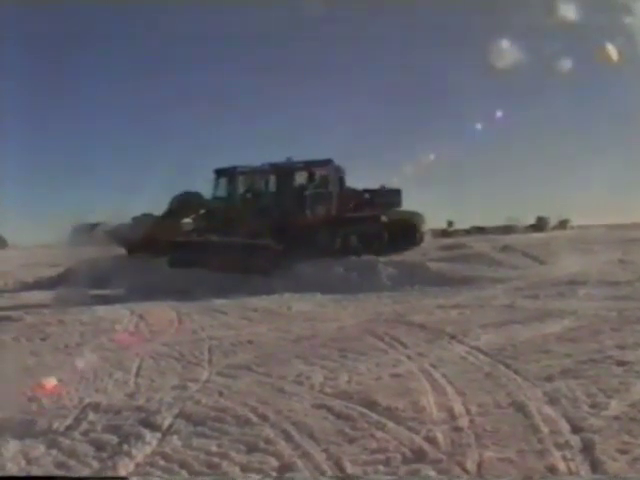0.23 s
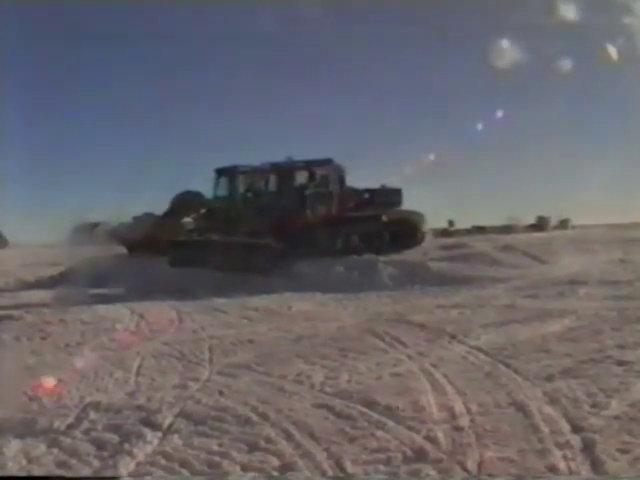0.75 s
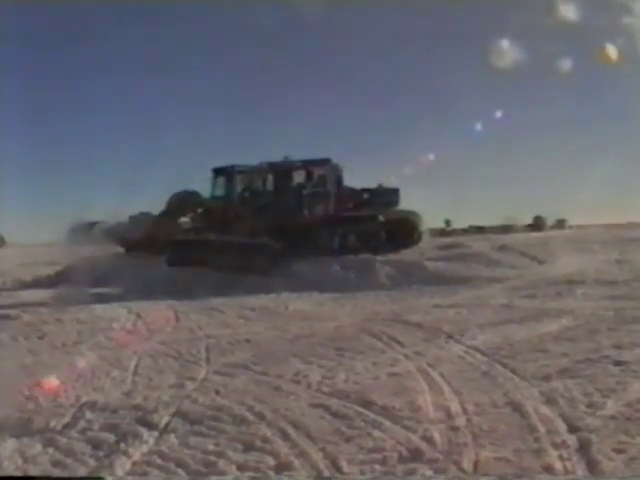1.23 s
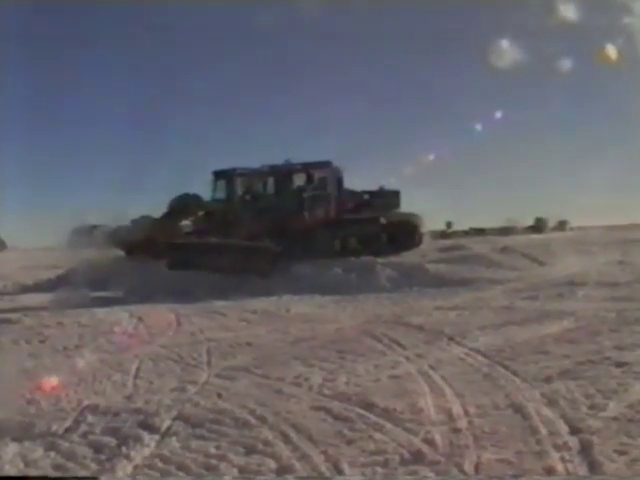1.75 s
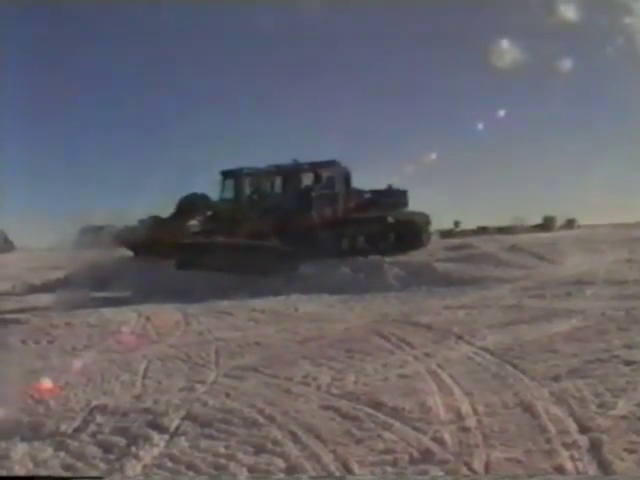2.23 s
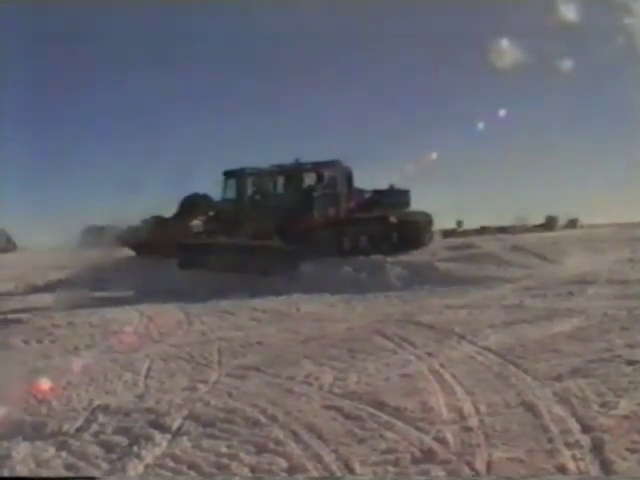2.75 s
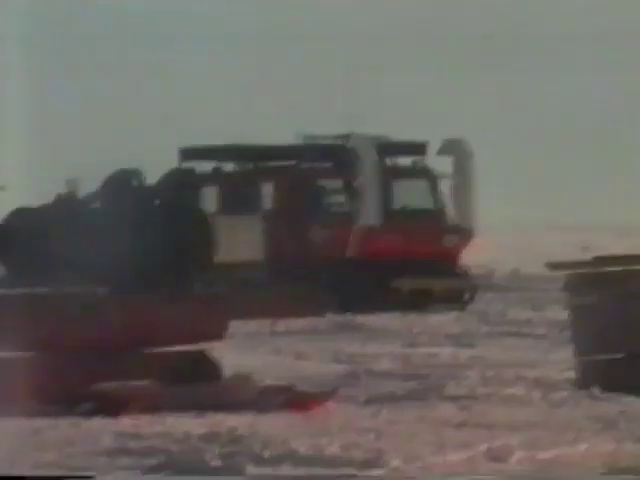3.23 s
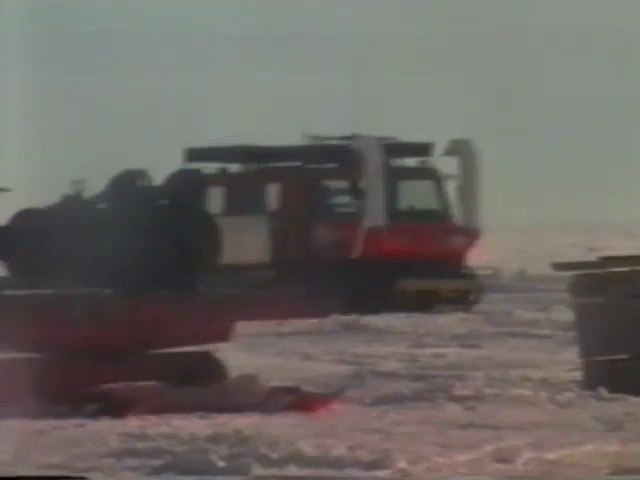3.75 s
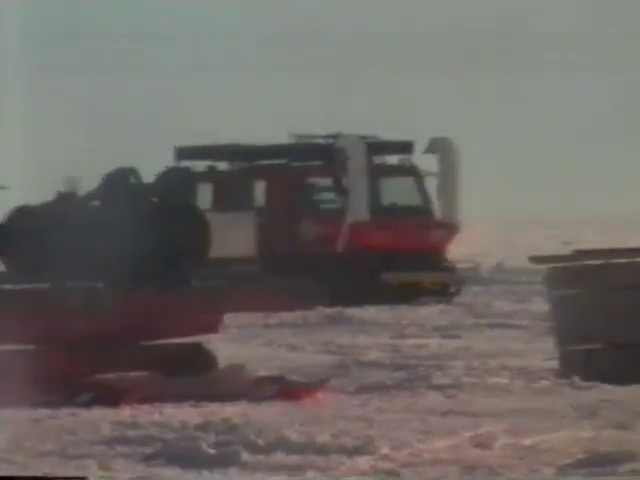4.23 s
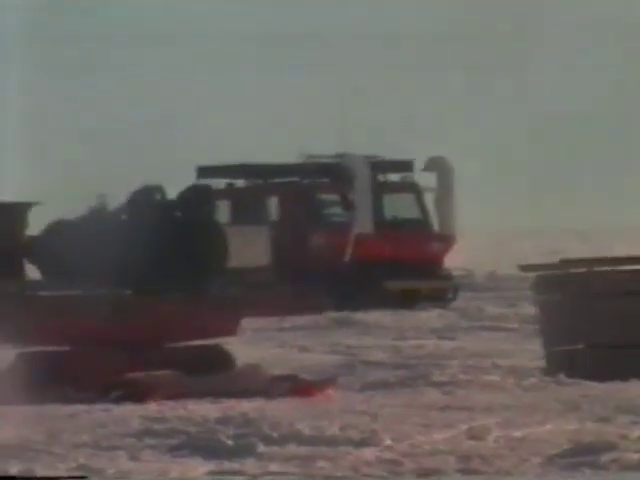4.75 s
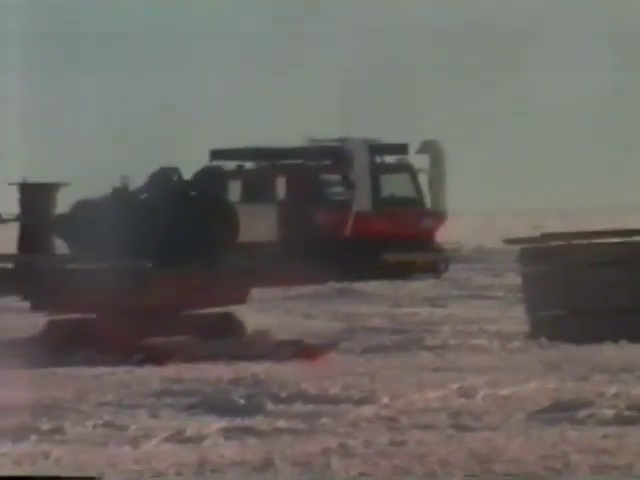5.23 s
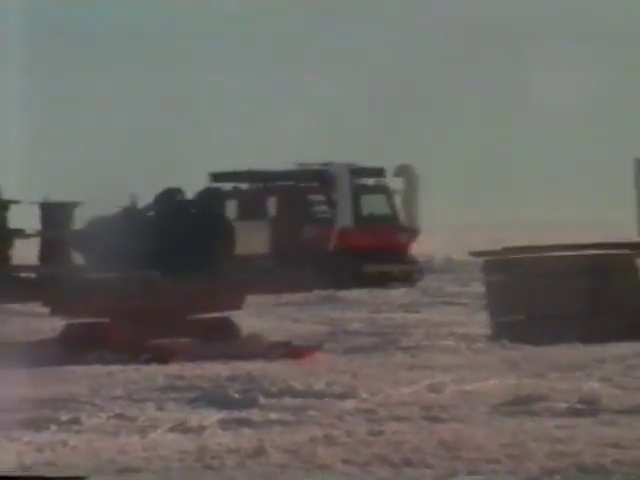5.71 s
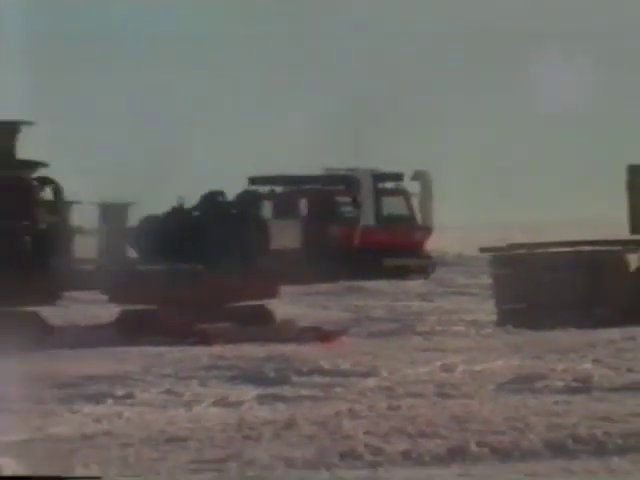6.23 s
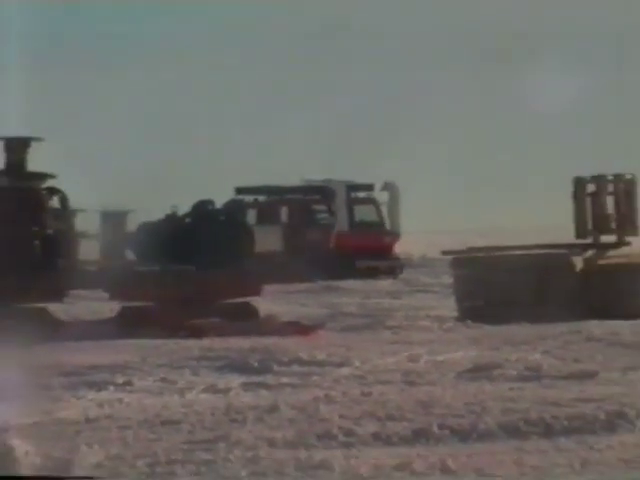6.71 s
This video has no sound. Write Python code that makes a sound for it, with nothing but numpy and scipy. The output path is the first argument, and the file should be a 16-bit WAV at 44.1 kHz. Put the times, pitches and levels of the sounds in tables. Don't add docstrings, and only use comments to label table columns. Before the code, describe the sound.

A tracked snow vehicle's rough diesel idle knocks unevenly under steady high hiss, switches abruptly to a second engine, and ends with a loose-part rattle.

```python
import sys
import numpy as np
from scipy import signal
from scipy.fft import rfft, irfft, next_fast_len
from scipy.io import wavfile
from scipy.ndimage import map_coordinates

SR = 44100
rng = np.random.default_rng(int(sys.argv[2]) if len(sys.argv) > 2 else 0)


def volts(x):
    e = np.asarray(x, float) / 20
    return 10 ** e


def unload_wav(signal):
    wavfile.write(
        sys.argv[1],
        SR,
        np.round(np.clip(np.atleast_2d(signal).T, -1, 1) * 32767).astype(np.int16),
    )


N = 307818

CUT_S = 3.335
FRAME_HZ, LINE_HZ = 25, 15625

# rate in Hz, first cycle in seconds, share of noise that repeats (0-1).
CYCLE_NEAR = (12.424, 0, .45)
CYCLE_FAR = (12.404, 0, .4)
# place in the cycle (0-1), strength in dB, sharpness in dB.
BLOWS_NEAR = [
    (.012, -2, 4),
    (.062, -.5, 1.5),
    (.115, -1.5, 1),
    (.188, -1.5, -1.5),
    (.262, 4, -.5),
    (.34, -3.5, 3.5),
    (.41, -3.5, -4),
    (.73, -7, -5),
    (.83, -5.5, 3.5),
    (.94, -6.5, -5),
]
BLOWS_FAR = [
    (.05, -8, 1),
    (.22, -1.5, 3),
    (.275, -.5, 1.5),
    (.335, -3, 0),
    (.39, -.5, 2),
    (.45, -2, 2),
    (.505, 3.5, -1),
    (.56, -2.5, -1.5),
    (.635, -2, -1),
    (.73, -5, 1),
]
# low edge in Hz, high edge in Hz, decay in seconds, dB gained per dB of sharpness,
# steady level in dB for the near view, then for the far view.
PARTS = [
    (193, 740, 0.0026, -0.37, -7, -6),
    (901, 1603, 0.0017, 0.1, -1.2, 1),
    (1853, 2350, 0.0056, 1.4, 10, 0),
    (2245, 3184, 0.0055, 1.1, -5, -4),
    (3700, 10000, 0.002, 0.44, -2.5, -3.5),
]
# frequency in Hz, level in dB per Hz.
COLOUR_NEAR = [(250, -39), (420, -31), (530, -12.5), (728, -6), (976, -11.5), (1060, -2), (1220, -1.5),
               (1550, -8.5), (2130, -7.5), (2350, -9.5), (2660, -15), (3400, -21), (5410, -24.5),
               (6820, -28), (7800, -33), (10100, -64), (17200, -120)]
COLOUR_FAR = [(250, -38), (420, -13.5), (489, -16), (576, -3), (629, -8), (687, -3.5), (1290, -1),
              (1600, -0.5), (1750, -2.5), (2280, 2.5), (3690, -14), (4460, -12.5), (5530, -17.5),
              (6680, -16.5), (8600, -25), (11200, -40), (18900, -120)]
# frequency in Hz, width in Hz, boost in dB.
PANELS_NEAR = [(1184, 24, 3.5), (1266, 78, 3), (1445, 27, 5), (2130, 60, 2.5), (2625, 236, 8),
               (3950, 300, -3.5), (4310, 150, 3.5), (4580, 140, 3.5), (5120, 70, 3.5), (6850, 200, 2.5)]
PANELS_FAR = [(742, 84, 4.5), (1613, 43, 4), (1727, 18, 5.5), (1917, 28, 7), (1967, 17, 6), (2064, 34, 3.5),
              (2280, 31, 5.5), (3750, 350, -1.5), (4296, 90, 5.5), (4740, 250, 1.5)]
# time in seconds, load in dB.
LOAD_NEAR = [
    (0, 2.5),
    (.45, 1.5),
    (1.4, -0.2),
    (1.7, 0.1),
    (2.52, 0.9),
    (2.66, 1.9),
    (3.35, 3.2),
]
LOAD_FAR = [
    (3.33, .9),
    (4.3, -1.1),
    (4.7, .9),
    (5.15, 0.83),
    (5.3, -.9),
    (5.7, -0.32),
    (6.1, 1.4),
    (6.98, -0.39),
]
# engine level in dB, fan level in dB, dB per dB of load for each part, the same for the fan.
DRIVE_NEAR = (-39, -59.5, [.2, 0.19, 0.2, 1.14, 0.99], 0.74)
DRIVE_FAR = (-43, -56, [0.21, -0.18, -0.089, 0.0024, 0.93], 1)
# time in seconds, strength in dB, sharpness in dB (raises the high knock, lowers the low).
RATTLE = [(6.724, -44, -2), (6.739, -40, 4), (6.756, -36, 6), (6.762, -40, 0.5), (6.776, -33.5, 2.5),
          (6.798, -37.5, 1), (6.816, -41.5, 8), (6.83, -41, 6), (6.845, -41, 1), (6.866, -46, 7),
          (6.894, -45.5, -3)]
# time in seconds, level in dB.
CRACKS = [
    (6.739, -46),
    (6.758, -44.5),
    (6.764, -44),
    (6.8, -55),
]
# frequency in Hz, level in dB per Hz.
LOOSE_PART = [
    [(100, -80), (200, -40), (330, -14), (500, -5), (700, 0), (900, -5), (1300, -26), (3000, -90)],
    [(200, -80), (500, -30), (900, -3), (1200, 0), (1600, -8), (2100, -7), (2800, -15), (4000, -32),
     (9000, -90)],
    [(800, -80), (2000, -30), (4000, -3), (7500, 0), (12500, 0), (15500, -6)],
]
# frequency in Hz, level in dB per Hz.
FAN_NEAR = [(5000, -90), (7000, -30), (8400, -8), (9000, -4), (10200, 0), (11000, -2.5), (12000, -8.5),
            (13500, -9.5), (14500, -15), (15000, -18), (15500, -13)]
FAN_FAR = [(5000, -90), (7000, -30), (8500, -8), (9500, -4.5), (10500, -1), (11200, 0), (12000, -3),
           (13000, -6), (14000, -9), (15000, -12), (15500, -11)]
# frequency in Hz, level in dB per Hz.
RUMBLE = [(20, -10), (100, -8), (250, -2), (450, 0), (700, -20), (1500, -90)]
# frequency in Hz, level in dB.
BUZZ = [(20, 1), (40, 3.5), (130, 2), (230, -6), (400, -18.5), (800, -10), (3000, -38), (15000, -37)]
# time in seconds, peak in dB.
TICKS = [(0.738, -44), (.978, -47), (2.578, -44), (3.658, -42), (4.018, -37), (4.578, -44), (4.699, -43),
         (6.378, -43)]
# frequency in Hz, level in dB.
CROSSTALK = [(250, -42), (345, -30), (520, -19.5), (1400, -19.5), (2800, -23.5), (5500, -24.5), (7300, -26),
             (11000, -28), (13000, -34), (15000, -36)]
# frequency in Hz, level in dB per Hz.
TAPE_HISS = [(20, -1), (100, -3), (350, .1), (700, 0.5), (2000, 0), (2800, -4.5), (4100, -15), (7300, -25),
             (11000, -25), (13000, -33), (15500, -30)]
# frequency in Hz, level in dB per Hz.
TAPE_FLUTTER = [(15, -10), (35, -8), (90, -5), (250, -12), (600, -79)]


def unit(x):
    return x / np.sqrt(np.mean(x ** 2) + 1e-20)


def along(points, hz):
    f, v = np.transpose(points)
    return np.interp(np.log(hz + 1), np.log(f + 1), v)


def load_curve(rows):
    s, load_db = np.transpose(rows)
    return np.interp(np.arange(N) / SR, s, load_db)


def wobble(rate):
    knots = rng.standard_normal(int(N * rate / SR) + 4)
    return map_coordinates(knots, [np.arange(N) * rate / SR])


def filtered(x, gain):
    m = 2 * next_fast_len(N // 2 + 8192)
    cepstrum = irfft(np.log(gain(np.fft.rfftfreq(m, 1 / SR)) + 1e-6), m)
    cepstrum[1:m // 2] *= 2
    cepstrum[m // 2 + 1:] = 0
    return irfft(rfft(x, m) * np.exp(rfft(cepstrum)), m)[..., :N]


def coloured_noise(colour):
    return unit(filtered(rng.standard_normal(N), lambda hz: volts(along(colour, hz))))


def band(hz, low_hz, high_hz):
    return ((1 + (low_hz / (hz + 1)) ** 12) * (1 + (hz / high_hz) ** 12)) ** -.5


def repeating(starts, share, drift):
    size = int(np.max(np.diff(starts))) + 1
    fresh = rng.standard_normal((len(starts) + 20, size))
    slow = signal.lfilter([np.sqrt(1 - drift ** 2)], [1, -drift], fresh, axis=0)[20:]
    turn = np.clip(np.searchsorted(starts, np.arange(N), "right") - 1, 0, None)
    again = slow[turn, np.clip(np.arange(N) - starts[turn], 0, size - 1)]
    return np.sqrt(share) * again + np.sqrt(1 - share) * rng.standard_normal(N)


def engine(cycle, blows, colour, panels, load, drive, which):
    rate, first, share = cycle
    place, strength_db, sharp_db = np.transpose(blows)
    level_db, _, per_part, _ = drive
    load_db = load_curve(load)
    turns = np.arange(int(N / SR * rate) + 2)
    starts = np.round((first + turns / rate) * SR).astype(int)
    when = (starts[:, None] + place % 1 * SR / rate).astype(int).ravel()
    shared_scatter = rng.standard_normal((len(turns), len(place)))
    noise = repeating(starts, share, .85)
    t = np.arange(SR // 40) / SR

    def ring(hz):
        panel_db = sum(db / (1 + (2 * (hz - c) / w) ** 2) for c, w, db in panels)
        return volts(along(colour, hz) + panel_db)

    total = 0
    for (low_hz, high_hz, decay, feels, *steady_db), grow in zip(PARTS, per_part):
        own_scatter = rng.standard_normal(shared_scatter.shape)
        blow_db = strength_db + feels * sharp_db + .8 * shared_scatter + 1.4 * own_scatter
        power = volts(2 * blow_db).ravel()
        fade = np.exp(-t / decay) * (1 - np.exp(-t / .0015))
        swell = signal.fftconvolve(np.bincount(when, power, N + SR), fade / fade.max())[:N]
        shake = unit(noise * np.sqrt(np.abs(swell) + volts(2 * steady_db[which])))
        part = filtered(shake, lambda hz: ring(hz) * band(hz, low_hz, high_hz))
        total = total + part * volts(grow * load_db)
    hz = np.fft.rfftfreq(4096, 1 / SR)
    middle = np.sqrt(np.mean(ring(hz) ** 2 * (hz > 500) * (hz < 1700)))
    return volts(level_db) * total / middle


def pump():
    t = np.arange(N) / SR
    tone = filtered(rng.standard_normal(N), lambda hz: 1 / (1 + ((hz - 1613) / 18) ** 2))
    swell_db = 3 * np.cos(2 * np.pi * (CYCLE_FAR[0] * t - .45))
    eased = (1 + np.tanh((t - 4.4) / 0.11)) / 2
    return volts(-51.5 - 7.5 * eased + swell_db) * unit(tone)


def rattle():
    levels, t = np.zeros((3, N + SR)), np.arange(SR // 8) / SR
    knock_t60 = np.array([[0.096], [0.058]])
    for s, db, sharp_db in RATTLE:
        both_db = np.array([[db - sharp_db], [db + sharp_db]]) - 60 * t / knock_t60
        start = round(s * SR)
        levels[:2, start:start + len(t)] += volts(both_db) * np.minimum(t / 0.00099, 1)
    for s, db in CRACKS:
        start = round(s * SR)
        levels[2, start:start + len(t)] += volts(db - 60 * t / 0.06) * np.minimum(t / .0012, 1)
    bursts = levels[:, :N] * rng.standard_normal((3, N))
    hz, total = np.fft.rfftfreq(4096, 1 / SR), 0
    for burst, colour in zip(bursts, LOOSE_PART):
        even = 1 / np.sqrt(np.mean(volts(2 * along(colour, hz))))
        total = total + even * filtered(burst, lambda hz: volts(along(colour, hz)))
    return total


def fan(colour, cycle, loudest, load, drive):
    hiss = coloured_noise(colour)
    duck_db = -1.2 * np.cos(2 * np.pi * (cycle[0] * np.arange(N) / SR - loudest))
    _, level_db, _, grow = drive
    return volts(level_db + grow * load_curve(load) + duck_db + 0.77 * wobble(9)) * hiss


def near_notch(hz):
    return 1 - .99 / (1 + ((hz - 8070) / 260) ** 6)


def rumble():
    return volts(-63.5) * coloured_noise(RUMBLE)


def video_leak():
    t, frames = np.arange(N) / SR, np.arange(int(N / SR * FRAME_HZ)) / FRAME_HZ
    steps, ticks = np.zeros(N), np.zeros(N)
    steps[((frames + .0044) * SR).astype(int)] = 0.61 + 0.068 * rng.standard_normal(len(frames))
    steps[((frames + .0244) * SR).astype(int)] = -1 + 0.056 * rng.standard_normal(len(frames))
    ticks[((frames + .0178) * SR).astype(int)] = volts(-56 + 3 * rng.standard_normal(len(frames)))
    for s, db in TICKS:
        ticks[round((s - .0002) * SR)] = volts(db)
    spikes = np.convolve(ticks, np.hanning(5), "same")
    buzz = unit(filtered(steps, lambda hz: volts(along(BUZZ, hz))))
    head_turn = 2 * np.pi * 2 * FRAME_HZ * t
    hum = np.sin(head_turn + 4.2)
    sway = np.array([wobble(2.8), wobble(3)])
    whistle = volts(1.3 * sway) * np.sin(2 * np.pi * LINE_HZ * t + .8 * sway + .25 * np.sin(head_turn))
    half_line = volts([[-84], [-110]]) * np.sin(np.pi * LINE_HZ * t + sway) * (t < CUT_S)
    steady = volts([[-63], [-70]]) * buzz + volts([[-68], [-79]]) * hum + volts([[-71], [-84]]) * whistle
    return steady + half_line + spikes


def scene():
    t = np.arange(N) / SR
    near = engine(CYCLE_NEAR, BLOWS_NEAR, COLOUR_NEAR, PANELS_NEAR, LOAD_NEAR, DRIVE_NEAR, which=0)
    far = engine(CYCLE_FAR, BLOWS_FAR, COLOUR_FAR, PANELS_FAR, LOAD_FAR, DRIVE_FAR, which=1)
    fan_near = filtered(fan(FAN_NEAR, CYCLE_NEAR, 0.33, LOAD_NEAR, DRIVE_NEAR), near_notch)
    fan_far = fan(FAN_FAR, CYCLE_FAR, 0.61, LOAD_FAR, DRIVE_FAR)
    hiss = np.where(t < CUT_S, fan_near, fan_far)
    turn = np.pi / 2 * np.clip((t - CUT_S - 0.005) * FRAME_HZ, 0, 1)
    engines = filtered(near, near_notch) * np.cos(turn) + (far + pump()) * np.sin(turn)
    left = engines + rattle() + hiss + rumble()
    return np.array([left, 0 * left])


def top_cut(x):
    return signal.sosfilt(signal.butter(12, 16140, fs=SR, output="sos"), x)


def record(dry):
    hz = np.fft.rfftfreq(N, 1 / SR)
    late = np.exp(-1.4j * np.pi * hz / SR)
    leak = -irfft(rfft(dry[0]) * volts(along(CROSSTALK, hz)) * late, N)
    hiss = unit(filtered(rng.standard_normal(dry.shape), lambda hz: volts(along(TAPE_HISS, hz))))
    flutter = unit(filtered(rng.standard_normal(dry.shape), lambda hz: volts(along(TAPE_FLUTTER, hz))))
    tape_noise = volts([[-82], [-64.5]]) * hiss + volts([[-72], [-77]]) * flutter
    tape = np.array([dry[0], leak]) + tape_noise + video_leak()
    mix = irfft(rfft(tape) * (hz < 15750), N)
    return top_cut(mix)


dry = scene()
out = record(dry)
unload_wav(out)
```